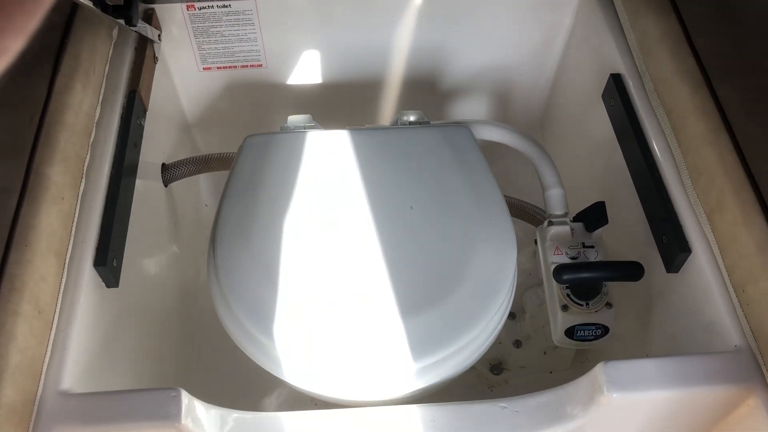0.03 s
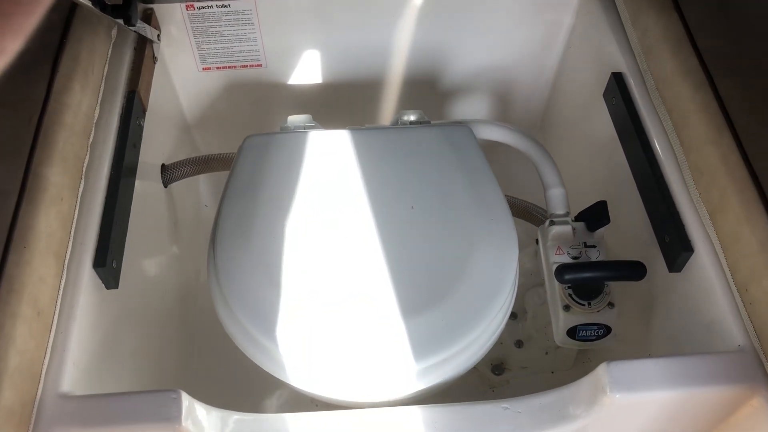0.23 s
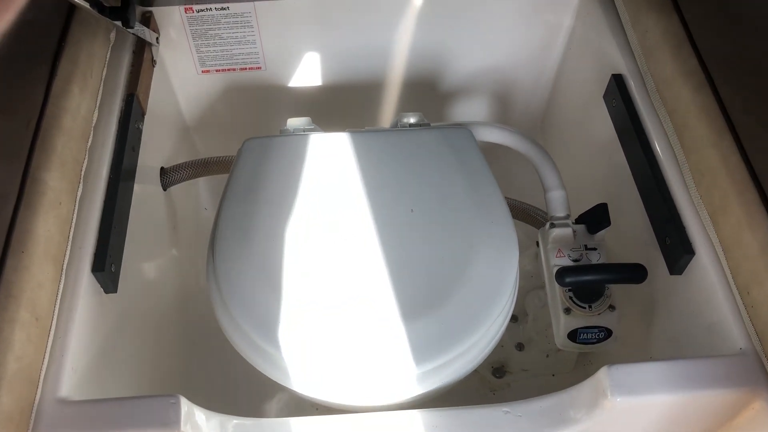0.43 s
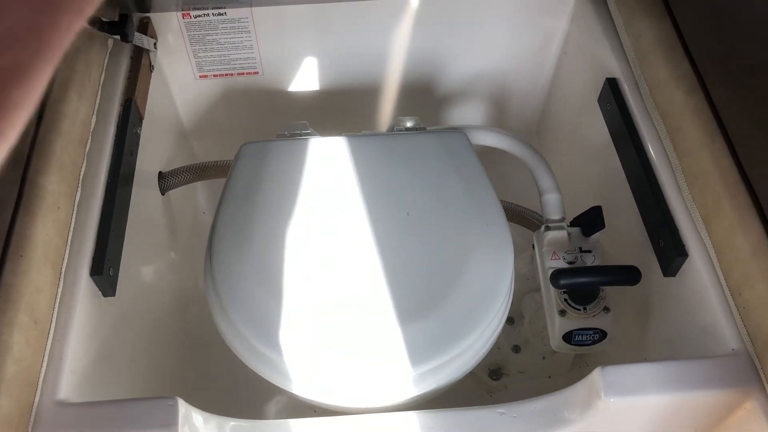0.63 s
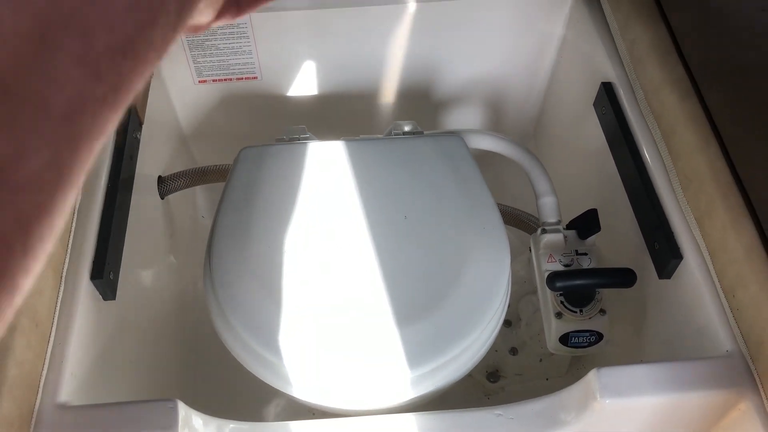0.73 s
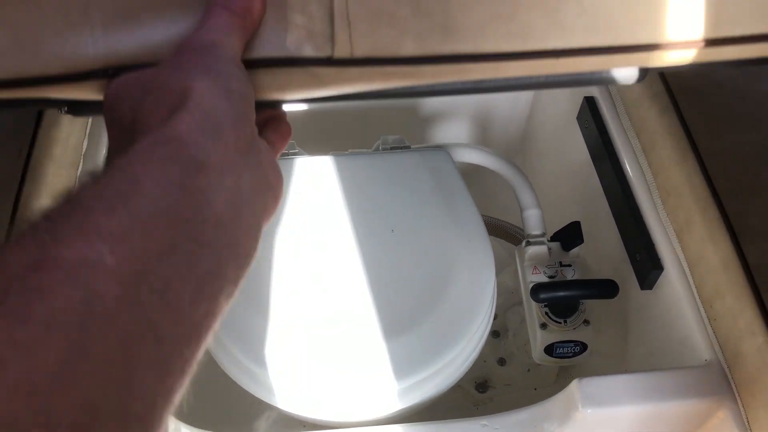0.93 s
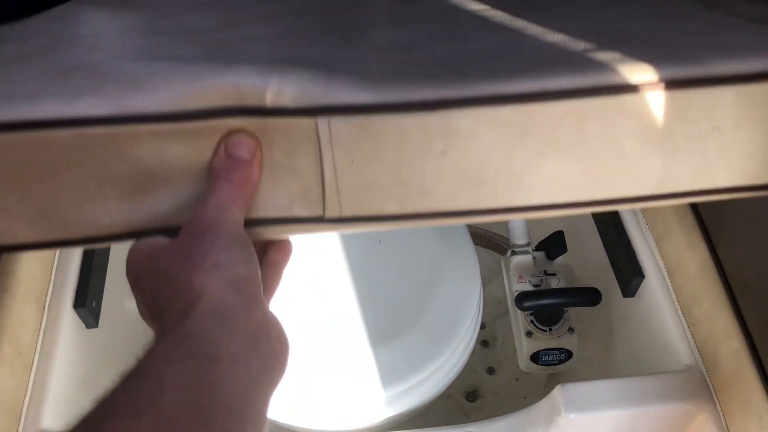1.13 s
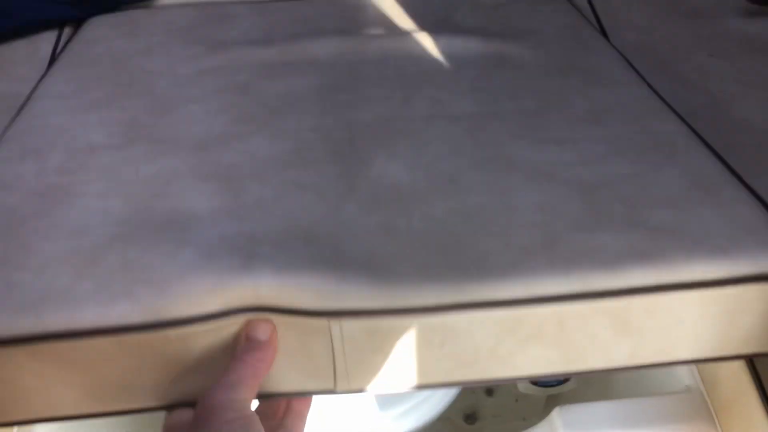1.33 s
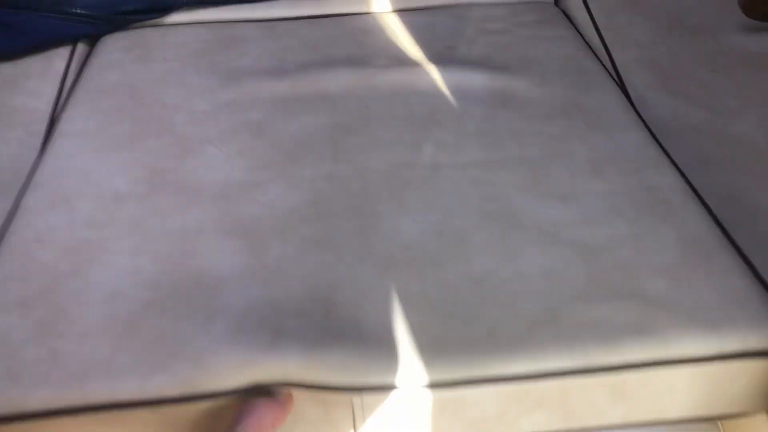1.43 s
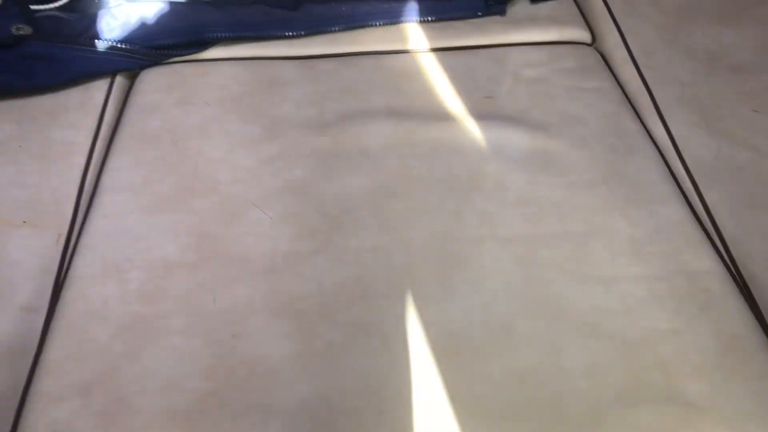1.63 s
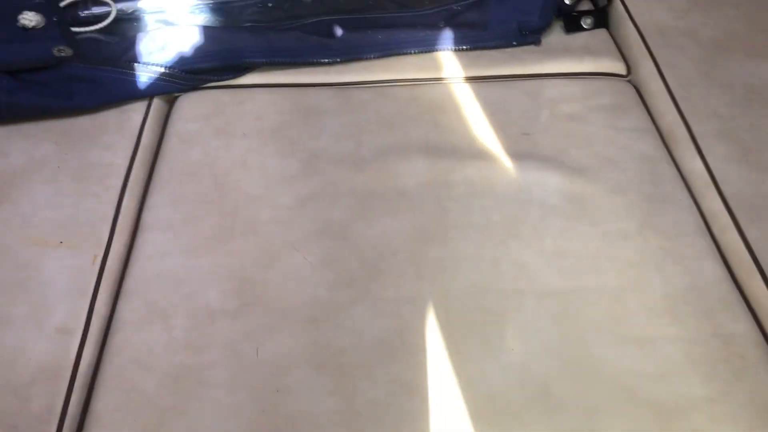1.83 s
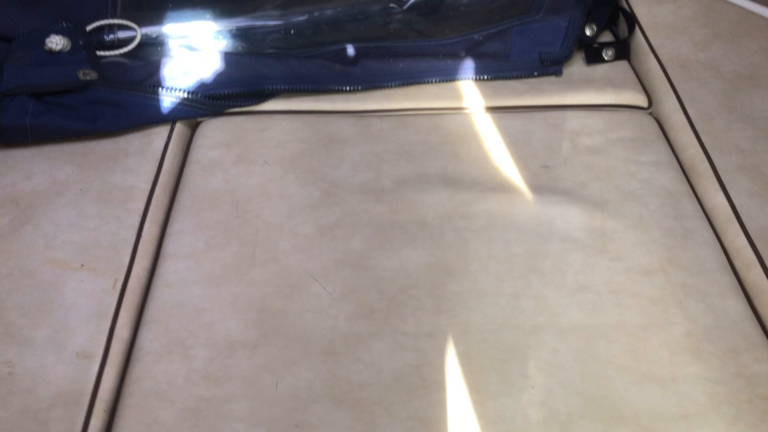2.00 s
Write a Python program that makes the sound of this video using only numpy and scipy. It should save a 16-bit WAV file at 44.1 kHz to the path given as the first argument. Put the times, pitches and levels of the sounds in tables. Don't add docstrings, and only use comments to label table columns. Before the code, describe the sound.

Close microphone in a hushed little cabin: a hand rustles vinyl and makes a board creak, a seam snaps, then the cushioned lid slams with a deep boxy thud, brief rattle and weaker knocks.

```python
import sys
import numpy as np
from scipy import signal
from scipy.fft import rfft, irfft
from scipy.io import wavfile
from scipy.ndimage import uniform_filter1d

SR = 44100
rng = np.random.default_rng(int(sys.argv[2]) if len(sys.argv) > 2 else 0)


def volts_from_decibels(level):
    exponent = np.asarray(level, float) / 20
    return 10 ** exponent


def wav_out(sig):
    wavfile.write(sys.argv[1], SR, np.round(np.clip(np.atleast_2d(sig).T, -1, 1) * 32767).astype(np.int16))


N = 90978
t = np.arange(N) / SR


def unit(x):
    return x / np.sqrt(np.mean(x ** 2))


def colour(x, points):
    hz, db = np.array(points, float).T
    f = np.maximum(np.arange(len(x) // 2 + 1) * SR / len(x), 1)
    gain = volts_from_decibels(np.interp(np.log(f), np.log(hz), db, left=-60))
    return irfft(rfft(x) * gain, len(x))


def dull(x, top_hz):
    return signal.sosfilt(signal.butter(3, min(top_hz, 18000), fs=SR, output="sos"), x)


def ring(x, hz, t60):
    pole = np.exp(2j * np.pi * hz / SR - np.log(1000) / (t60 * SR))
    return signal.lfilter([1], [1, -pole], x).imag


def fall(t0, t60, rise=.001):
    u = np.maximum(t - t0, 0)
    return (1 - np.exp(-u / rise)) * volts_from_decibels(-60 * u / t60)


def hump(t0, length):
    return np.sin(np.pi * np.clip((t - t0) / length, 0, 1)) ** 2


def walk(rate):
    k = int(SR / rate)
    return unit(uniform_filter1d(uniform_filter1d(rng.standard_normal(N), k), k))


def grains(per_s, spread_db):
    hits = rng.random(N) < per_s / SR
    return hits * rng.standard_normal(N) * volts_from_decibels(spread_db * rng.exponential(size=N))


def breeze(points, flicker_db):
    out, noise = 0, colour(rng.standard_normal(N), points)
    for hz in 30 * 2. ** np.arange(10):
        octave = [(hz / 2, -30), (hz / 1.5, -6), (hz, 0), (hz * 1.33, -6), (hz * 2, -60)]
        out = out + colour(noise, octave) * volts_from_decibels(flicker_db * walk(12))
    return out


def room(x):
    u = t[:SR // 2]
    pole = np.exp(-2 * np.pi * 5000 / SR)
    tail = signal.lfilter([1], [1, -pole], rng.standard_normal(len(u)))
    tail = tail * volts_from_decibels(-60 * u / 0.3) * np.clip(u / 0.03, 0, 1)
    return signal.fftconvolve(x, tail / np.sqrt(np.sum(tail ** 2)))[:N]


# f/Hz, level/dB
CABIN_COLOUR = [(15, -56), (25, -6.5), (153, -7.5), (195, -10), (405, -16), (1190, -24.5), (1520, -25),
                (2050, -31.5), (16000, -39.5)]


def cabin():
    return volts_from_decibels(-64.5) * unit(breeze(CABIN_COLOUR, 0.36))


# t/s, f/Hz, level/dB
SQUEAL_GLIDE = [
    (.05, 1593, -83),
    (0.132, 1583, -84.5),
    (0.201, 1525, -85),
    (0.301, 1460, -78),
]


def squeal():
    at, pitch, level = np.array(SQUEAL_GLIDE).T
    hz = np.interp(t, at, pitch) * (1 + 0.002 * walk(37))
    gate = np.clip(np.minimum(t - at[0], at[-1] - t) / 0.011, 0, 1)
    loudness = volts_from_decibels(np.interp(t, at, level) + 2 * walk(30))
    return 1.7 * gate * loudness * np.sin(2 * np.pi * np.cumsum(hz) / SR)


# t/s, rustle level/dB, sheen level/dB, cushion rumble level/dB
HAND_MOTION = [(0, -82, 2.5, -29), (0.428, -96, 11, -17), (.53, -85, 7, -9), (.56, -71.5, 7, 6.5),
               (.7, -71, 3.5, 0.5), (.86, -67.5, 0.5, 3.5), (.9, -63.5, 3, 0.5), (.97, -67, 3, 0.5),
               (1.04, -73.5, 1.5, -0.5), (1.13, -65, -1.5, -1), (1.33, -65.5, 2.5, 2),
               (1.41, -62, -1.5, 3.5), (1.528, -58.5, 1, 3.5), (1.7, -57.5, 1.5, -1.5),
               (1.79, -54, 5.5, 12.5), (1.86, -59, 12, -2), (1.93, -58, -14.5, 8), (2.06, -57, 3, 5.5)]
# f/Hz, level/dB
VINYL_COLOUR = [(24, -31), (40, -14), (151, -1), (199, -2), (600, -6.5), (896, -13.5), (2840, -13.5),
                (8990, -23), (16000, -33.5)]


def rustle():
    at, *levels = np.array(HAND_MOTION).T
    motion_db, sheen_db, rumble_db = [np.interp(t, at, level) for level in levels]
    hiss = unit(breeze(VINYL_COLOUR, 1.3))
    crackle = unit(colour(room(grains(1500, 2.5)), VINYL_COLOUR))
    vinyl = hiss + volts_from_decibels(-4) * crackle
    low, below_sheen = (colour(vinyl, [(.5, 0), (hz * .7, 0), (hz * 1.4, -30)]) for hz in (690, 6000))
    friction = below_sheen - low + volts_from_decibels(sheen_db) * (vinyl - below_sheen)
    cushion = low + volts_from_decibels(-6.5) * dull(low, 230)
    return volts_from_decibels(motion_db + 8.5) * friction + volts_from_decibels(0.36 * motion_db - 34.5 + rumble_db) * cushion


# t/s, level/dB, pitch f/Hz, scuff level/dB, scuff top f/Hz
BOARD_CREAKS = [(.265, -60.5, 546, 0, 2105), (.335, -52.5, 740, -2.5, 6000), (.47, -55, 584, 0, 5000),
                (.543, -41, 592, -4, 8300), (.628, -59, 730, 10, 4360), (.635, -39.5, 557, -10.5, 4200),
                (.7205, -36.5, 570, -3.5, 2900), (.763, -42, 526, -25, 3000), (.796, -46.5, 575, -7, 2010),
                (.832, -54, 450, 3.5, 2000), (.852, -45, 545, -14, 1800), (.868, -46.5, 510, -1, 1970),
                (0.885, -62, 480, 14, 2000), (.903, -51.5, 466, 2, 4030), (1.066, -50.5, 630, -17, 2000),
                (1.15, -48.5, 587, -9, 1970), (1.167, -47.5, 657, 0, 1970), (1.18, -68, 586, 0, 1970),
                (1.279, -64, 507, -20, 2000), (1.372, -38.5, 250, -3, 1960), (1.453, -37.5, 230, -4, 2430),
                (1.484, -36.5, 300, -38, 2000), (1.517, -39.5, 384, -26, 2000)]


def creaks():
    lead_s, ring_t60_s = 0.0051 / 2, 0.044
    scuff_colour = [(250, -9), (800, -4), (3000, -8), (7000, -8), (16000, -1)]
    out, hiss = 0, unit(colour(rng.standard_normal(N), scuff_colour))
    for s, db, hz, scuff_db, top_hz in BOARD_CREAKS:
        push = hump(s - lead_s, 2.46 / hz) * np.sin(2 * np.pi * hz * (t - s))
        tone = ring(push, hz, ring_t60_s) + volts_from_decibels(1.5) * ring(push, hz * 1.264, ring_t60_s * 0.64)
        scuff = volts_from_decibels(scuff_db + 6) * dull(hiss, top_hz) * fall(s - lead_s, 0.11, 0.0018)
        out = out + volts_from_decibels(db) * (tone / np.abs(tone).max() + scuff)
    return out + volts_from_decibels(-16.5) * room(out)


# t/s, level/dB, centre f/Hz, tail level/dB
SEAM_SNAPS = [
    (0.446, -63.5, 2970, -5),
    (1.3714, -37, 7550, -21),
    (1.404, -45, 1700, -14),
    (1.415, -45, 1700, -16),
    (1.4512, -18, 4860, -21.5),
    (1.4825, -40, 1500, -43),
    (1.992, -61, 11800, 3.5),
]
# f/Hz, level/dB
SNAP_ANSWER = [(300, 2.5), (1500, -7), (4000, -7.5), (7000, -5), (10000, -18), (16000, -21)]


def snaps():
    click_s, gap_s, pair_s = .0016, .0015, .0006
    out, noise = 0, rng.standard_normal(N)
    answer = unit(colour(noise, SNAP_ANSWER))
    for s, db, hz, tail_db in SEAM_SNAPS:
        tint = [(hz / 8, -12), (hz / 3, -2), (hz, 0), (hz * 1.8, -2), (hz * 4, -6)]
        fizz, at = unit(colour(noise, tint)), np.arange(N) - int(s * SR)
        pair = colour((at == 0) - .9 * (at == int(pair_s * SR)), tint)
        pair = pair / np.abs(pair).max() + volts_from_decibels(-3) * ring((at == 0) + 0., hz, .002)
        click = pair / np.abs(pair).max() + .3 * fizz * hump(s - click_s / 2, click_s)
        tail = (answer if hz < 10000 else fizz) * fall(s + gap_s, .25, 0.00045)
        out = out + volts_from_decibels(db) * (click + volts_from_decibels(tail_db) * tail)
    return out


# t/s, thud level/dB, thud lag t/s, rattle level/dB, rattle top f/Hz
BLOWS_OF_LID = [
    (1.794, -20.5, 0.0011, -23, 2940),
    (1.8052, -4.5, 0.0061, -6.5, 9400),
    (1.822, -12.5, 0.0036, -22.5, 5000),
    (1.836, -15.5, 0.002, -22.5, 4400),
    (1.8904, -16.5, 0.00019, -27.5, 4170),
    (1.944, -18.5, 0.0044, -24.5, 6000),
]
MAIN_BLOW_S, MAIN_BLOW_DB = BLOWS_OF_LID[1][:2]


def shaking():
    clicks = unit(grains(2300, 1.0)) + 2.0 * rng.standard_normal(N)
    out = 0
    for s, _, _, rattle_db, top_hz in BLOWS_OF_LID:
        envelope = fall(s, 0.051, 0.00084) + volts_from_decibels(2) * fall(s, 0.068, 0.0063)
        out = out + volts_from_decibels(rattle_db - 21.5) * unit(dull(clicks * envelope, top_hz))
    return out


# f/Hz, level/dB
CRACK_COLOUR = [(300, -2), (1200, -11.5), (3300, -5.5), (5500, -12), (8000, -24), (11000, -32),
                (16000, -56)]


def crack(shake):
    return volts_from_decibels(-1.5) * colour(shake, CRACK_COLOUR)


# f/Hz, level/dB, t60/s
LATCH_MODES = [(1820, -24, 0.055), (2200, -55, 0.048), (2330, -26, .04), (2900, -17, 0.028),
               (3300, -24, 0.019), (3416, -6.5, 0.054), (3466, -4, 0.02), (3450, -12, 0.033),
               (4020, -23, 0.017), (4460, -31, 0.027), (4660, -23, 0.037), (6150, -32, 0.017)]


def latch(shake):
    out = 0
    for k, (hz, db, t60) in enumerate(LATCH_MODES):
        out = out + (-1) ** k * volts_from_decibels(db) * ring(shake, hz, min(t60, .01))
    return 0.062 * out


# t/s, level/dB, pitch f/Hz
LATCH_TICKS = [(1.7955, -28.5, 2060), (1.798, -22, 2900), (1.8080, -13.5, 3060), (1.8070, -12.5, 4780),
               (1.8125, -16, 4620), (1.8102, -11, 3530), (1.815, -19, 3310), (1.819, -17, 3650),
               (1.831, -18, 3210), (1.8435, -18, 3540), (1.876, -27, 3200), (1.889, -41, 3000),
               (1.895, -20, 3340), (1.902, -28, 3300), (1.949, -23, 3230), (1.957, -31, 3360)]


def ticks():
    out, push_s = 0, 0.0013
    for s, db, hz in LATCH_TICKS:
        push = hump(s - push_s / 2, push_s) * (1 + .5 * rng.standard_normal(N))
        tone = 0
        for f, partial_db in ((hz, 0), (hz * 1.5, -11.5)):
            tone = tone + volts_from_decibels(partial_db) * ring(push * np.sin(2 * np.pi * f * (t - s)), f, 0.01)
        out = out + volts_from_decibels(db) * tone / np.abs(tone).max()
    return out


# f/Hz, level/dB
WASH_COLOUR = [(250, -16), (600, -14), (1500, -5), (3400, 7), (6000, 3), (9000, -11.5), (16000, -26.5)]


def wash():
    return volts_from_decibels(-22) * unit(colour(rng.standard_normal(N), WASH_COLOUR)) * fall(MAIN_BLOW_S, 0.18, 0.002)


def puff():
    breath = unit(ring(rng.standard_normal(N), 45, 0.11))
    return volts_from_decibels(-47) * breath * np.exp(-((t - 1.765) / 0.03) ** 2)


# f/Hz, level/dB, t60/s
LID_MODES = [(48.5, -20, 0.45), (75.4, -18, 0.3), (130.7, -9.5, 0.13), (168.5, 1.5, 0.11),
             (192.4, -5.5, 0.059), (255, -7, 0.063), (360.5, -15.5, 0.15), (442.4, -10, 0.058),
             (480, -17, 0.15), (577, -12.5, 0.061), (668, -26, 0.086), (793.4, -17.5, 0.054),
             (942.6, -24.5, 0.052), (1088, -23, 0.042)]


def thud():
    push_s, max_t60_s = 0.011, .13
    grit = 1 + 0.2 * rng.standard_normal(N)
    pushes = np.zeros((len(LID_MODES), N))
    mode_hz, mode_db = np.array(LID_MODES)[:, :1], np.array(LID_MODES)[:, 1:2]
    for s, thud_db, lag, _, _ in BLOWS_OF_LID:
        push = volts_from_decibels(thud_db) * grit * hump(s + lag, push_s) / (push_s * SR / 4)
        soft_db = 0.15 * (thud_db - MAIN_BLOW_DB) * np.log2(np.maximum(mode_hz / 200, 1))
        on = push != 0
        pushes[:, on] += volts_from_decibels(mode_db + soft_db) * push[on] * np.cos(2 * np.pi * mode_hz * (t[on] - s))
    return sum(ring(p, hz, min(t60, max_t60_s * max(1, 150 / hz)))
               for p, (hz, _, t60) in zip(pushes, LID_MODES))


def lid():
    boom = thud()
    shake = shaking()
    air = puff()
    x = boom + latch(shake) + ticks() + crack(shake) + wash()
    return x + volts_from_decibels(-14) * room(x) + air


def scene():
    return (lid() + creaks() + snaps() + rustle() + squeal() + cabin())[None]


def low_pass(x):
    return signal.sosfilt(signal.butter(12, 16660, fs=SR, output="sos"), x)


def record(dry):
    x = signal.sosfilt(signal.butter(3, 38, "high", fs=SR, output="sos"), dry)
    mix = signal.sosfilt(signal.ellip(8, .3, 27, 15700, fs=SR, output="sos"), x)
    return low_pass(mix)


dry = scene()
out = record(dry)
wav_out(out)
```